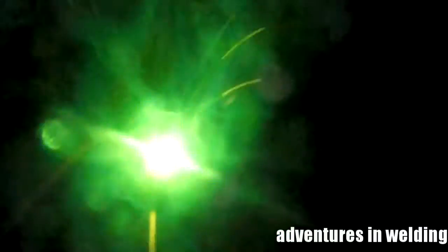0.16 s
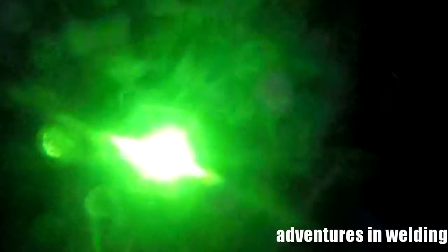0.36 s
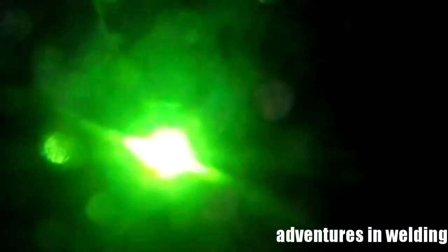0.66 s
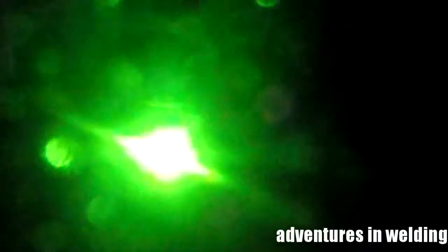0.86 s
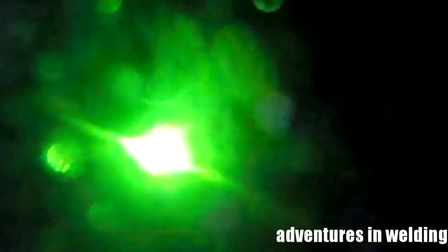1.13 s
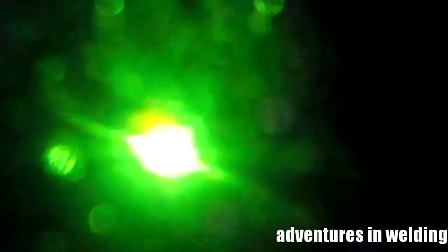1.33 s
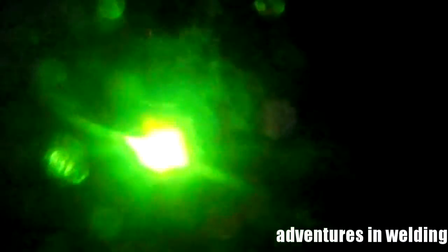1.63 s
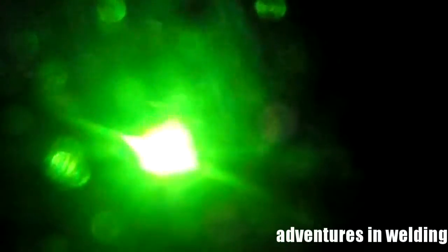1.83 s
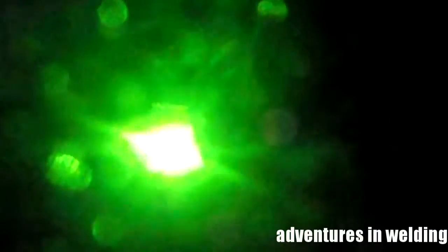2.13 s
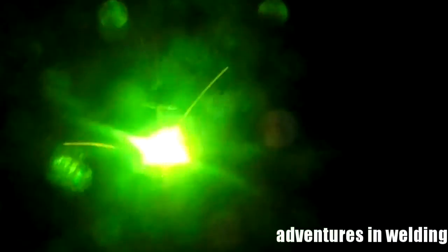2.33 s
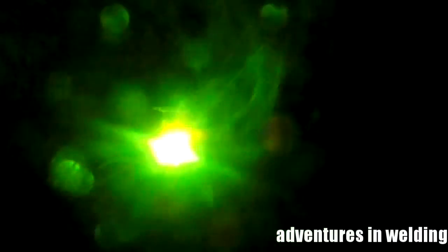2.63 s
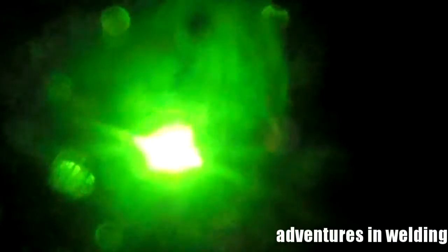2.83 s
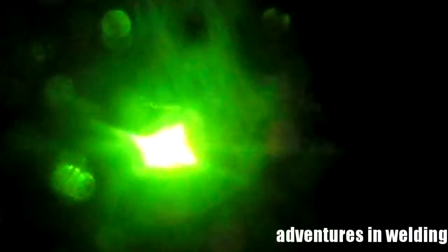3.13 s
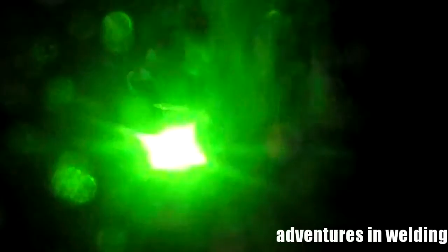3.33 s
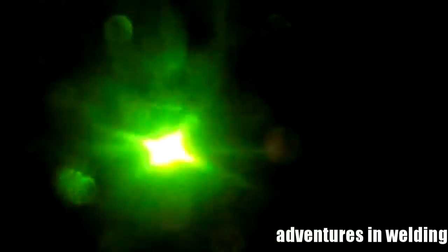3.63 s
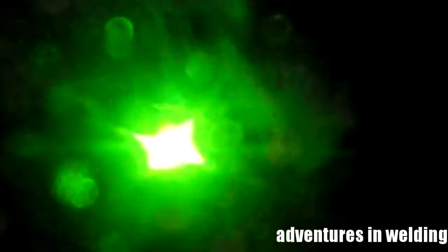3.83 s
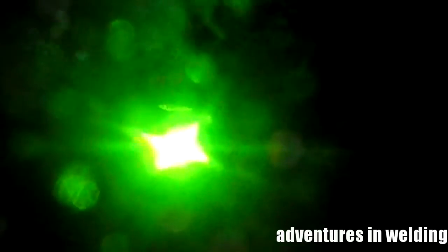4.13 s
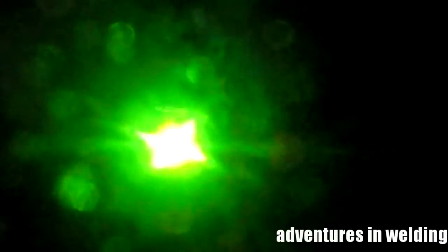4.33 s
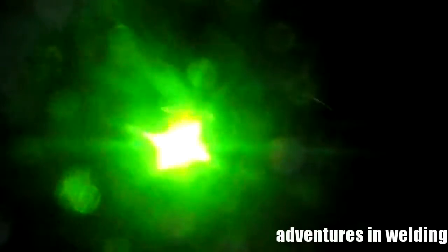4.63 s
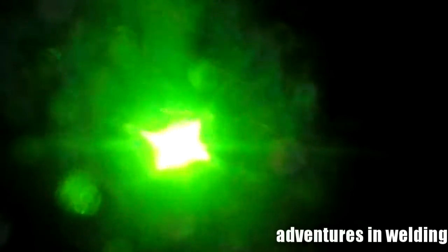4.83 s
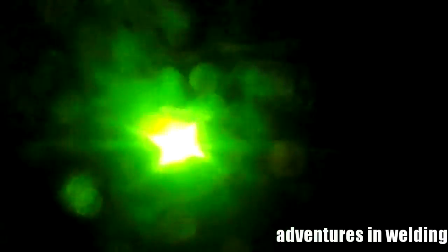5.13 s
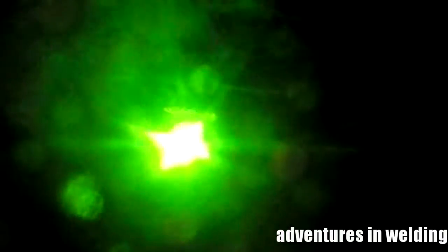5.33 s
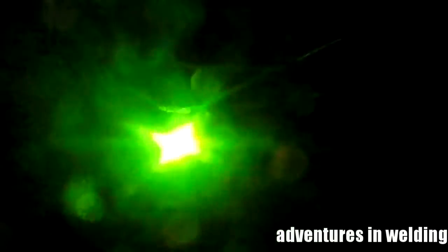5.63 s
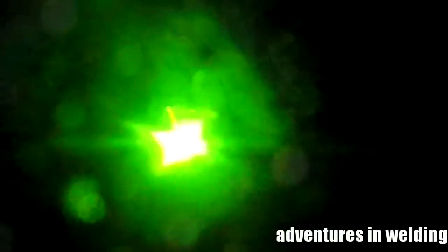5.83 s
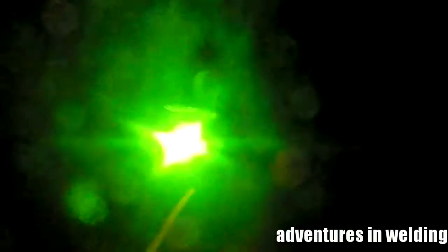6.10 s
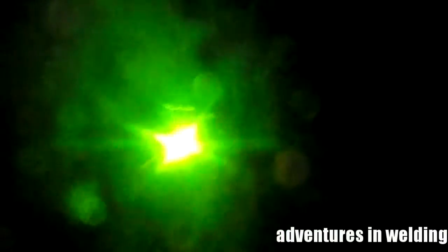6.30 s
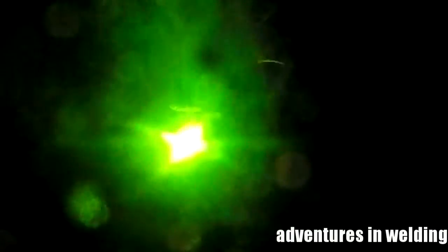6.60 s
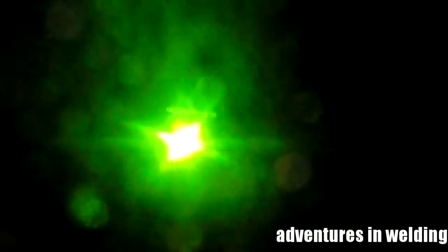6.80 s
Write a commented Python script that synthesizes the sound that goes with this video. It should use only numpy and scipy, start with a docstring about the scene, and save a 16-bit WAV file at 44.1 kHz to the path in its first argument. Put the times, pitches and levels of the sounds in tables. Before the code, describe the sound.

A welding arc burns on thick metal plate, heard from very close in a workshop. From the first instant, sharp, dry pops crackle at roughly twenty a second, unevenly spaced and varying in strength. Many carry a small thump and a brief spit of spray, and tiny sparks tick between them. Underneath, a soft fluttering gas hiss and the faint rush and hum of a cooling fan continue throughout.

The opening is dense, with a quick rattling stutter around 0.1 seconds. Short gaps break the runs near 1.0, 2.4, 3.0, 3.7, 4.4 and 5.0 seconds, and further little stutters come near 2.6 and 3.9. After 5.3 seconds the pops thin to a few scattered snaps, leaving the hiss more exposed. A last run starts at 6 seconds and lasts until about 6.9. Each pop rings very briefly off the metal and nearby walls.

```python
"""A MIG weld pass on thick plate in a workshop, the microphone close behind a welding lens.
From the start the arc hisses softly over the welder's fan. The wire dips into the pool with a tick;
milliseconds later the molten bridge bursts and the arc strikes again with a sharp pop.
The pops ring in the work station and come in uneven runs, with a quick stutter here and there.
They thin out after 5.3 s, and a last run sets in at 6 s."""
import sys
import numpy as np
from scipy import signal
from scipy.fft import rfft, irfft
from scipy.io import wavfile
from scipy.ndimage import uniform_filter1d, minimum_filter1d

SR = 44100
rng = np.random.default_rng(int(sys.argv[2]) if len(sys.argv) > 2 else 0)


def inscribe(sig):
    """Save sig as 16-bit PCM at rate SR to the path in sys.argv[1].

    A 1-D sig is mono; a 2-D sig holds one channel per row.
    Samples are clipped to [-1, 1] before scaling.
    """
    pcm = np.round(np.clip(np.atleast_2d(sig).T, -1, 1) * 32767)
    wavfile.write(sys.argv[1], SR, pcm.astype(np.int16))


N = 306936


def amp(db):
    return 10 ** (np.asarray(db) / 20)


def unit_rms(x):
    return x / np.sqrt(np.mean(x ** 2) + 1e-20)


def curve_at(points, hz):
    """Read a curve along a logarithmic frequency axis."""
    point_hz, value = np.transpose(points)
    return np.interp(np.log(hz + 1), np.log(point_hz + 1), value)


def convolve(x, response):
    return signal.oaconvolve(x, response)[:len(x)]


def colour(x, spectrum, size=4096):
    """Minimum-phase filter, so that clicks keep their sharp fronts."""
    hz = abs(np.fft.fftfreq(size, 1 / SR))
    log_gain = np.log(amp(curve_at(spectrum, hz)))
    response = np.fft.ifft(np.exp(np.conj(signal.hilbert(log_gain)))).real
    return convolve(x, response[:size // 2])


def clicks(times_s, heights, size=N):
    """Single impulses at the given times."""
    at = np.clip(np.round(times_s * SR).astype(int), 0, size - 1)
    return np.bincount(at, heights, size)


def drift(rate_hz):
    """A smooth random wander of rms 1."""
    hz = np.fft.rfftfreq(N, 1 / SR)
    return unit_rms(irfft(rfft(rng.standard_normal(N)) / (1 + (hz / rate_hz) ** 2) ** 2, N))


def fan(rush_db=-52, waver=0.00287):
    """The welder's cooling fan: a low rush and a few faint wavering tones."""
    # spectrum of the rush: frequency_hz, gain_db
    rush_spectrum = [(20, -31), (65, -4), (120, -16), (235, 0.5), (330, -4.5), (450, -4.5), (600, -2.5),
                     (900, -13), (2000, -33), (6000, -38)]
    # tones of the fan: pitch_hz, level_db
    fan_tones = [(225, -60.5), (262, -70), (340, -62), (522, -58.5), (1044, -67)]
    wavering_s = np.cumsum(1 + waver * drift(5.76)) / SR
    tones = sum(amp(db) * unit_rms(np.sin(2 * np.pi * hz * wavering_s)) for hz, db in fan_tones)
    return amp(rush_db) * unit_rms(colour(rng.standard_normal(N), rush_spectrum)) + tones


def arc_hiss(strike_s, crack_db, base_db=-53, flutter_db=-2.0, flare=5, flare_s=0.017):
    """The burning arc and its shielding gas hiss; the arc flares briefly after each strike."""
    # spectrum of the hiss: frequency_hz, gain_db
    hiss_spectrum = [(200, -13), (700, -10.5), (1100, -1.5), (1900, 2), (2600, -6.5), (4500, -3.5),
                     (6800, -6.5), (10000, -18), (15000, -30)]
    cooling = np.exp(-np.arange(8192) / SR / flare_s)
    heat = 1 + flare * convolve(clicks(strike_s, amp(crack_db)), cooling)
    swell = amp(.8 * drift(4))
    hiss = unit_rms(colour(rng.standard_normal(N), hiss_spectrum))
    return amp(base_db) * hiss * heat * swell * amp(flutter_db * drift(140))


def spatter(per_s=70, smallest_db=-47):
    """Tiny sparks snap at random; a few are larger."""
    heights = amp(smallest_db + 3.5 * np.minimum(rng.exponential(1, N), 3))
    return heights * rng.choice([-1., 1.], N) * (rng.random(N) < per_s / SR)


def strikes(stutter_per_s=120, jitter=0.34, spread_db=4):
    """Times and relative levels of the arc's strikes, single or rattling as the wire stutters."""
    # single pops: start_s, crack_db, thump_db
    pops = [(.0454, 0, -40), (.0765, -6.5, -7), (.1142, -8, -5), (.1311, -4.5, -5.5), (.2084, 1, -1.5),
            (.2906, -3, -5.5), (.3466, 0, -4.5), (.406, -6, -12), (.4903, 0, -2.5), (.538, 0, -14),
            (.5759, -6.5, -17), (.5991, -3, -5), (.6543, -1.5, -1.5), (.7211, -2, -6), (.8018, -12, -18),
            (.8287, 1.5, -6), (.901, -11.5, -13), (.906, -1.5, -7), (.9447, -22, -23), (1.1393, 2, -7),
            (1.1683, -7.5, -19), (1.179, -3, -29), (1.2251, -5.5, -27), (1.231, 0, -13), (1.2838, 2.5, -17),
            (1.3551, -1.5, -2.5), (1.4057, -1, -8), (1.4181, -7.5, -5.5), (1.451, -10, -25),
            (1.4617, -3.5, -26), (1.4709, -7.5, -12), (1.5036, -17.5, -15), (1.5245, -2.5, -3.5),
            (1.5787, -0.5, -15), (1.6333, 0, -4.5), (1.745, -1.5, -7), (1.8031, 1.5, -7), (1.8601, 2, -2),
            (1.906, -1.5, -2), (1.9422, -15, -14), (1.9555, -3.5, -5), (1.9947, -2, -23), (2.0507, -2, -30),
            (2.1455, -4, -5.5), (2.1847, 0, -26), (2.2347, 2.5, -11), (2.3037, 4.5, -36),
            (2.4962, -0.5, -7), (2.541, -2.5, -17), (2.5825, -5, -16), (2.6349, -9, -28),
            (2.6413, -2, -4.5), (2.6892, -2.5, -3), (2.7322, -3.5, -11), (2.764, -1, -28),
            (2.8218, 0, -4.5), (2.8799, 1.5, -8.5), (2.9419, -1, -25), (3.1904, -16, -30),
            (3.2052, -1, -6.5), (3.2486, -1.5, -20), (3.2978, 0, -30), (3.3638, 1, -2), (3.4116, -1, -7),
            (3.4549, -9.5, -12), (3.4596, -11.5, -32), (3.5834, -1, -3.5), (3.6207, -5.5, -19),
            (3.6358, -3.5, -29), (3.8389, -1.5, -10), (3.879, -1.5, -37), (3.9759, -1, -5), (4.0176, 1, -5),
            (4.0714, -0.5, -16), (4.116, 0.5, -31), (4.1569, -3, -26), (4.2452, -0.5, -4.5),
            (4.2948, -0.5, -5), (4.3469, 0, -9), (4.5351, -1.5, -5), (4.5926, -0.5, -9),
            (4.6398, -9.5, -18), (4.6485, 0.5, -2.5), (4.714, -5, -26), (4.7288, -11.5, -24),
            (4.7798, 0, -6), (4.8285, 0, -5), (4.8732, -8.5, -14), (4.8906, -10.5, -28), (4.9362, -1, -15),
            (5.131, 2, -24), (5.1641, -1.5, -32), (5.203, -9.5, -17), (5.224, 0, -5), (5.301, 1.5, -6),
            (5.4348, -13.5, -30), (5.5863, -11.5, -44), (5.6205, -12, -29), (5.7723, 2, -24),
            (5.8218, -4.5, -32), (6.0125, -6.5, -14), (6.0138, 0.5, -5), (6.0664, -4, -12),
            (6.1288, 3, -12), (6.193, -5.5, -36), (6.2704, 0, -4.5), (6.3143, -3.5, -22),
            (6.3681, -10.5, -15.5), (6.4322, -7, -22), (6.5026, -11, -26), (6.5176, -5.5, -23),
            (6.5216, -4, -14), (6.5356, -8.5, -26), (6.6101, 0.5, -10), (6.6643, -4.5, -11),
            (6.714, -0.5, -9), (6.7473, -3, -31), (6.807, 2.5, -12), (6.8726, -7, -10)]
    # stutters of the wire in the pool: start_s, length_s, crack_db, thump_db
    stutters = [(0.0626, .012, -6.5, -10), (0.0887, .034, -6.5, -11.5), (0.416, .018, -18.5, -28),
                (2.5336, .008, -6.5, -14), (2.669, .012, -10, -24), (2.925, .014, -11.5, -28),
                (3.637, .009, -3.5, -30), (3.919, .012, -9, -14), (5.371, .012, -13.5, -22),
                (6.452, .012, -8.5, -34)]
    rows = list(pops)
    for start_s, length_s, crack_db, thump_db in stutters:
        gap_draw, level_draw = rng.uniform(-0.9, 1, (8, 2)).T
        gaps_s = (1 + jitter * gap_draw) / stutter_per_s
        for age_s, db in zip(np.cumsum(gaps_s) - gaps_s[0], spread_db * level_draw):
            if age_s < length_s:
                rows.append((start_s + age_s, crack_db + db, thump_db + db))
    return np.transpose(rows)


def grazes(strike_s, crack_db, share=0.38, lead_s=(0.0024, .008), relative_db=-14.5):
    """Shortly before some pops the wire grazes the pool and parts again with only a tick."""
    chance, lead = rng.random((len(strike_s), 2)).T
    graze_s = strike_s - np.interp(lead, [0, 1], lead_s)
    return clicks(graze_s, amp(crack_db + relative_db) * (chance < share))


def short_circuits(strike_s, crack_db, base_short_s=.003, db_per_doubling=12):
    """A tick as the wire touches, a crack as the molten bridge bursts, then the air rebounds."""
    # the blunt burst of a thick bridge: frequency_hz, gain_db
    blunt_spectrum = [(500, 3), (1800, 3), (4000, -6.5), (7500, -12.5), (15000, -3)]
    tick_draw, lag_draw, length_draw, thickness = rng.random((len(strike_s), 4)).T
    # a longer short builds up more current and ends in a louder crack
    short_s = base_short_s * 2 ** (crack_db / db_per_doubling) * (1 + .25 * (2 * length_draw - 1))
    tick_db = np.minimum(-15, crack_db + 1) + 2 * (tick_draw - 1)
    ticks = clicks(strike_s - short_s, amp(tick_db))
    sharp = clicks(strike_s, amp(crack_db) * (1 - thickness ** 2))
    blunt = colour(clicks(strike_s, amp(crack_db) * thickness ** 2), blunt_spectrum)
    rebounds = clicks(strike_s + .0008 * (0.16 + lag_draw), 0.12 * amp(crack_db))
    return ticks - sharp - blunt + rebounds


def droplets(strike_s, crack_db, gain_db=-17.0, growth=1.1, spread_db=3, rise_s=0.00074, per_s=9000):
    """The bursting bridge throws off a dense spray for a few milliseconds, louder for big pops."""
    # spectrum of the spray: frequency_hz, gain_db
    spray_spectrum = [(300, -15), (1500, -4), (4000, 3), (7500, 2.0), (16000, -1.5)]
    age = np.arange(1024) / SR / rise_s
    spray_db = growth * crack_db + spread_db * rng.uniform(-1.27, 1, len(strike_s))
    envelope = convolve(clicks(strike_s, amp(spray_db)), age * np.exp(1 - age))
    snaps = rng.standard_normal(N) * (rng.random(N) < per_s / SR)
    return amp(gain_db) * colour(envelope * snaps, spray_spectrum)


def gas_thumps(strike_s, thump_db, pitch_hz=430, decay_s=0.001, gain_db=-4.5):
    """Gas heated by each new arc swells and falls back in a damped swing, slower or faster each time."""
    t = np.arange(1024) / SR
    out = np.zeros(N + len(t))
    stretches = np.exp(0.23 * rng.uniform(-0.89, 1, len(strike_s)))
    for start, db, stretch in zip(np.round(strike_s * SR).astype(int), thump_db, stretches):
        swing = np.sin(2 * np.pi * pitch_hz * t / stretch) * np.exp(-t / (decay_s * stretch))
        out[start:start + len(t)] += amp(gain_db + db) * swing
    return out[:N]


def direct_path(x):
    """The short way round the lens to the microphone, with its early echoes."""
    # echoes off torch, plate and lens holder: delay_ms, signed_gain
    echoes = [(.34, -0.19), (.71, -0.072), (.95, -0.015), (1.58, 0.11), (1.72, -0.24), (2.032, 0.00087),
              (2.33, -0.058), (3.28, 0.021)]
    # colour of the path round the lens: frequency_hz, gain_db
    lens_shadow = [(100, -2.5), (1200, 0.5), (2100, -1.5), (2800, 0.5), (4200, -6), (6500, -11.5),
                   (8500, -13.5), (11000, -26.5), (16000, -29)]
    delay_ms, gain = np.transpose(echoes)
    early = clicks(delay_ms / 1000, gain, size=1024)
    return colour(x + convolve(x, early), lens_shadow)


def echo_tail(decay, start_ms, rise_ms, size=24000):
    """Dense echoes of energy 1, each band dying as decay says: frequency_hz, t60_s."""
    hz, t, bands = signal.stft(rng.choice([-1., 1.], size), SR, nperseg=256)
    bands = bands * amp(-60 * t / curve_at(decay, hz)[:, None])
    echoes = signal.istft(bands, SR, nperseg=256)[1][:size]
    age_ms = np.arange(size) * 1000 / SR
    echoes *= np.clip((age_ms - start_ms) / rise_ms, 0, 1)
    return echoes / np.linalg.norm(echoes)


def walls(x, booth_db=-8.5, slap_db=-15, shop_db=-24, tail_count=7):
    """Dense echoes of the booth, a quick slap off the nearest wall and the faint workshop."""
    # decay of the booth's near walls: frequency_hz, t60_s
    booth_decay = [(150, 0.067), (600, 0.16), (2000, 0.11), (6000, 0.12), (14000, 0.09)]
    # colour of the wall echoes: frequency_hz, gain_db
    wall_spectrum = [(60, -42), (165, 0.5), (550, -3.5), (950, -7), (1800, -7.5), (2700, -0.5), (4200, -7),
                     (5800, -6), (8000, -6), (10000, -8), (12000, -6), (15000, -18)]
    # ringing of plate, bench and hood: pitch_hz, width_hz, lift_db
    resonances = [(179, 26, 11), (333, 24, 9), (377, 24, 9), (490, 18, 3), (584, 34, 5), (1400, 46, 6),
                  (1604, 55, 4), (1755, 50, 5), (1863, 60, 6), (1959, 44, 6), (3673, 55, 4.5),
                  (4459, 44, 6), (4628, 30, 4), (4932, 44, 5), (5131, 32, 4), (6637, 48, 8), (6773, 48, 7)]
    # crossfade between several random tails so that no chance pitch rings out
    tail_blend = np.linspace(0, tail_count - 1, N)
    echoes = np.zeros(N)
    for k in range(tail_count):
        booth = amp(booth_db) * echo_tail(booth_decay, start_ms=3.0, rise_ms=2.9)
        slap = amp(slap_db) * echo_tail([(500, 0.0071), (7000, 0.009)], start_ms=6.43, rise_ms=1.0)
        shop = amp(shop_db) * echo_tail([(500, 0.26), (12000, 0.21)], start_ms=29.5, rise_ms=8.1)
        crossfade = np.cos(np.pi / 2 * np.clip(tail_blend - k, -1, 1))
        echoes += convolve(x * crossfade, booth + slap + shop)
    echoes = colour(echoes, wall_spectrum)
    ringing = sum((amp(lift_db) - 1) * signal.lfilter(*signal.iirpeak(hz, hz / width_hz, SR), echoes)
                  for hz, width_hz, lift_db in resonances)
    return echoes + ringing


def scene(crackle_db=12):
    """One close microphone: crackle and thumps in front, the hiss and the fan underneath."""
    # colour of crackle and thumps at the microphone: frequency_hz, gain_db
    pickup = [(20, -13), (60, -15), (130, -3), (300, -2), (600, 1.5), (850, -7.5), (1300, -0.5), (2000, 1),
              (2700, -5.5), (3700, 2.5), (7000, 3.5), (15000, -4.5)]
    strike_s, crack_db, thump_db = strikes()
    crackle = short_circuits(strike_s, crack_db) + grazes(strike_s, crack_db)
    crackle += droplets(strike_s, crack_db) + spatter()
    arc = amp(crackle_db) * (direct_path(crackle) + walls(crackle)) + gas_thumps(strike_s, thump_db)
    return (colour(arc, pickup) + arc_hiss(strike_s, crack_db) + fan())[None]


def record(dry, ceiling=.92, cutoff_hz=15700):
    """A fast peak limiter holds the loudest cracks just under full scale; a low-pass follows."""
    needed_gain = np.minimum(1, ceiling / (abs(dry) + 1e-9))
    limited = dry * uniform_filter1d(minimum_filter1d(needed_gain, size=13), size=13)
    lowpass = signal.firwin(201, cutoff_hz, window=("kaiser", 9), fs=SR)
    return signal.oaconvolve(limited, lowpass[None], "same")


dry = scene()
out = record(dry)
inscribe(out)
```